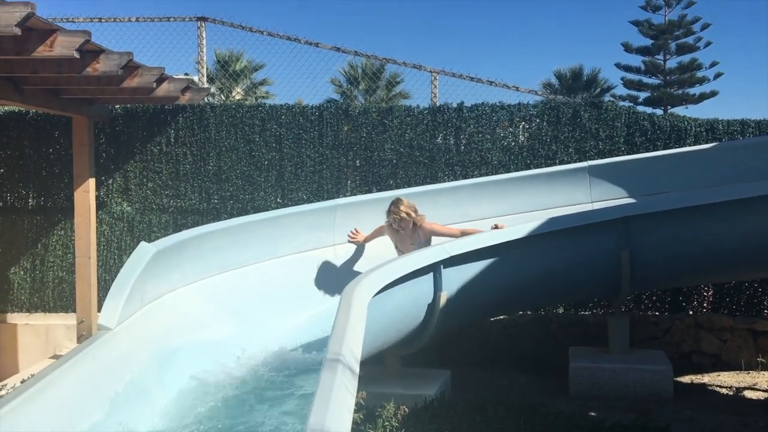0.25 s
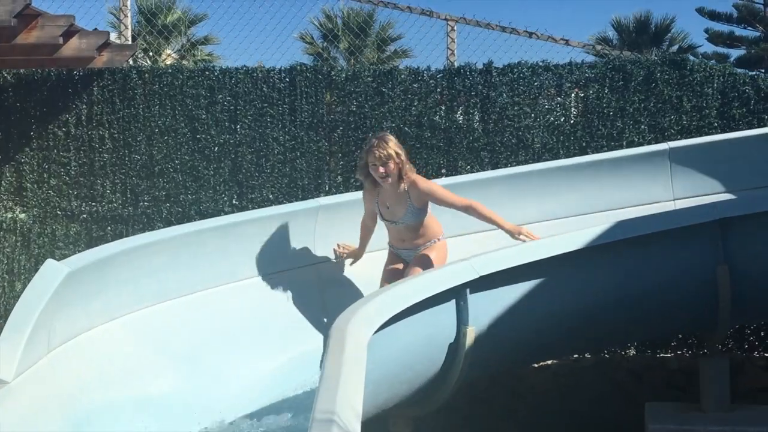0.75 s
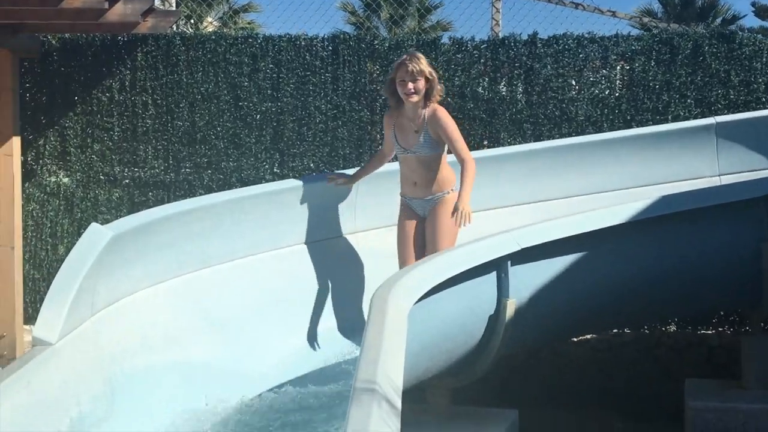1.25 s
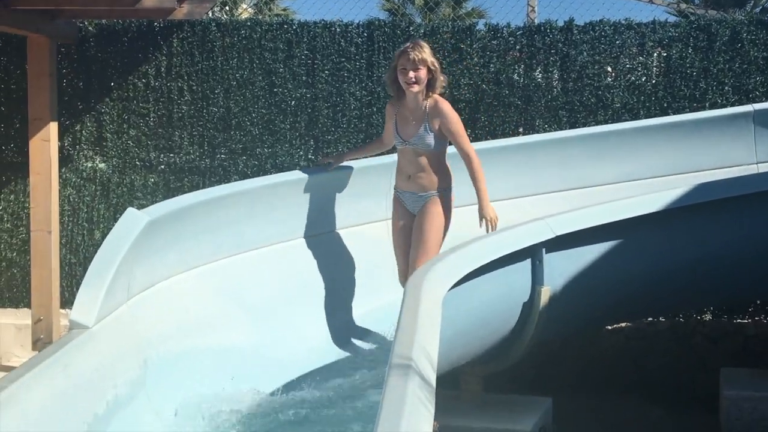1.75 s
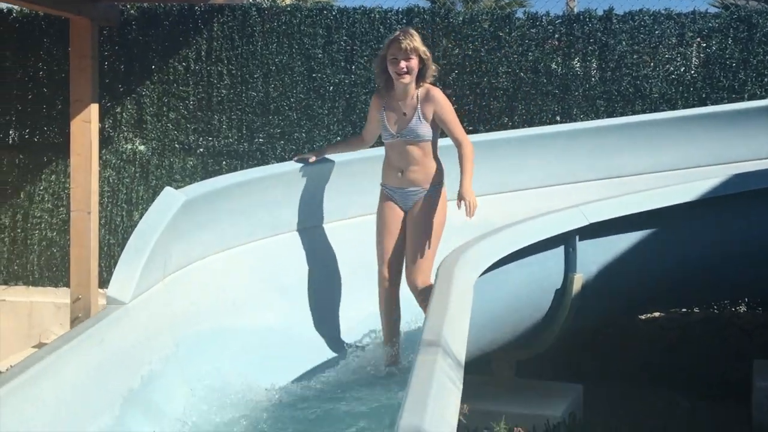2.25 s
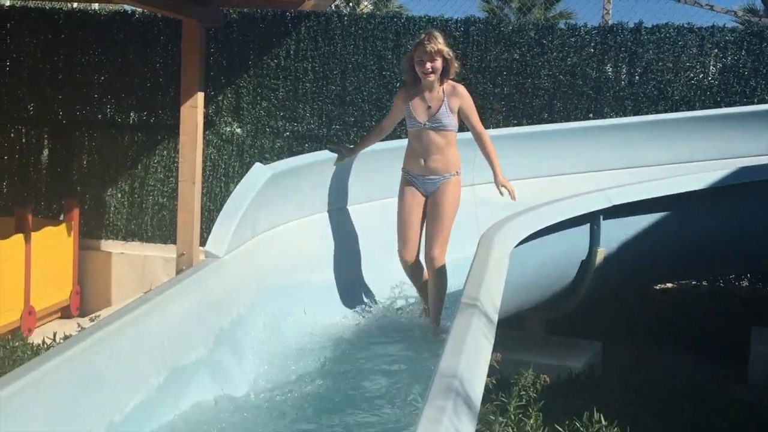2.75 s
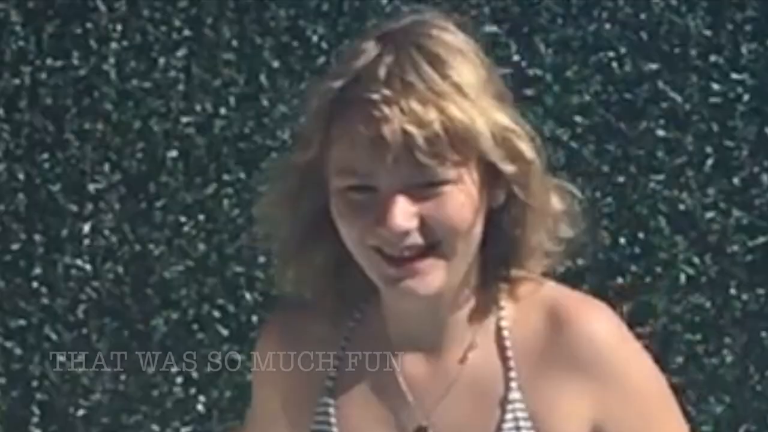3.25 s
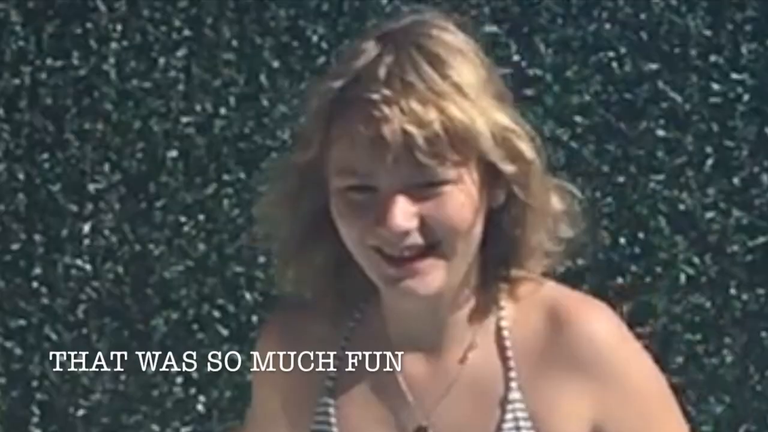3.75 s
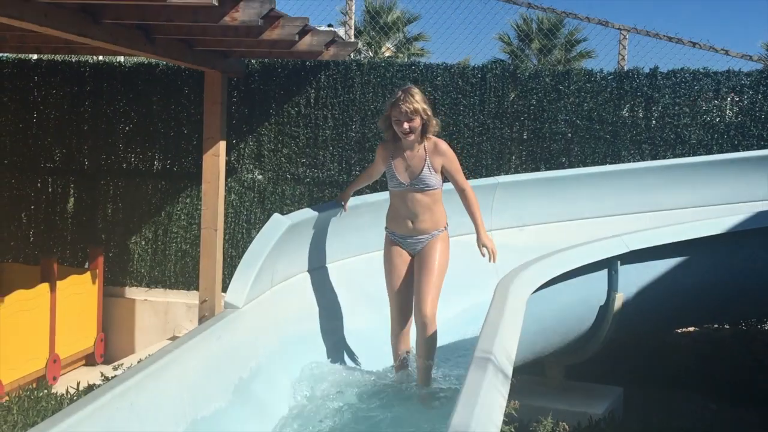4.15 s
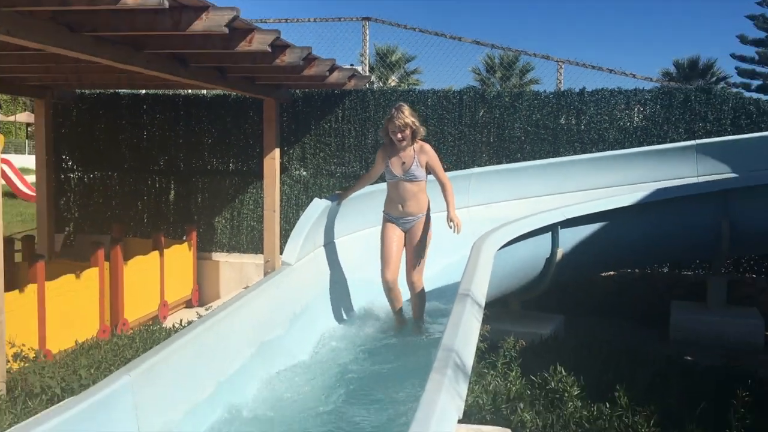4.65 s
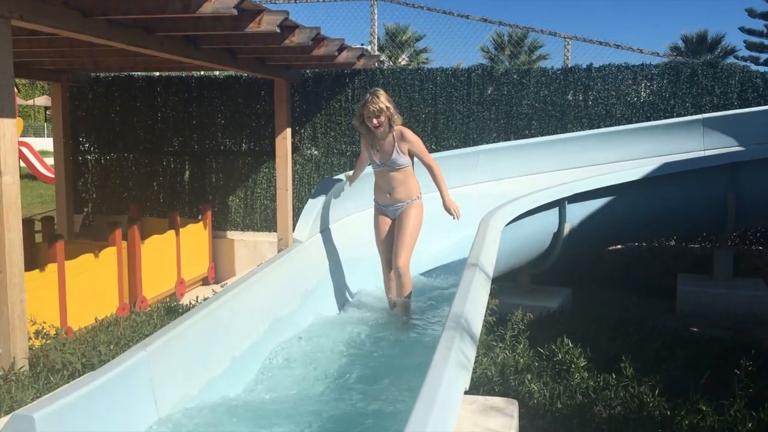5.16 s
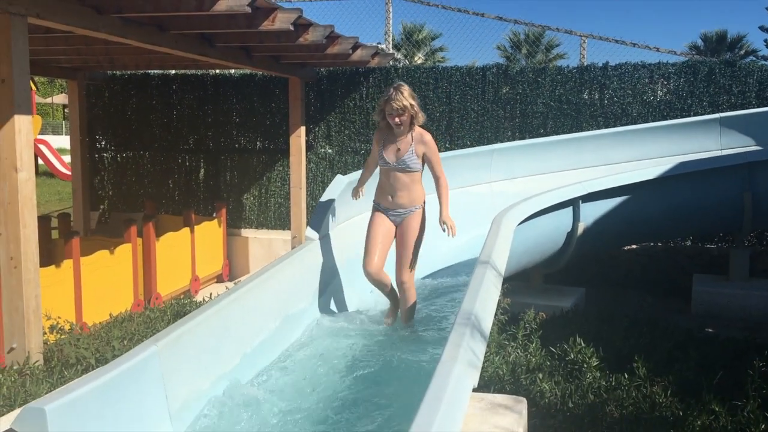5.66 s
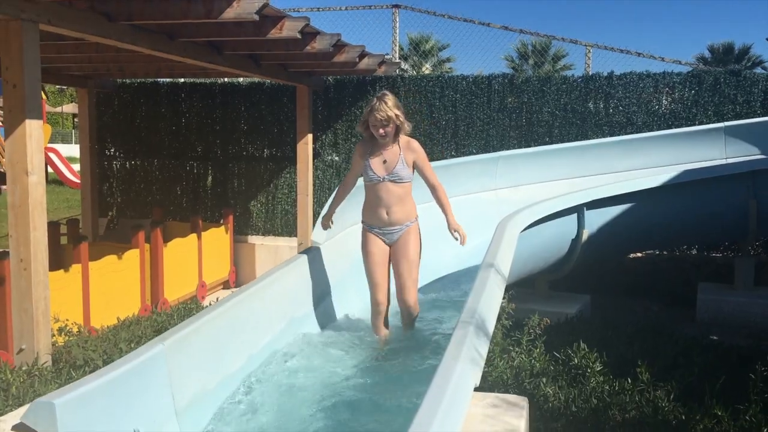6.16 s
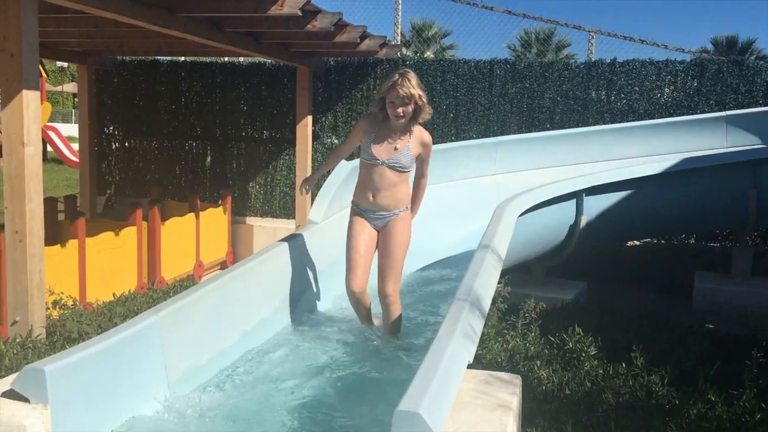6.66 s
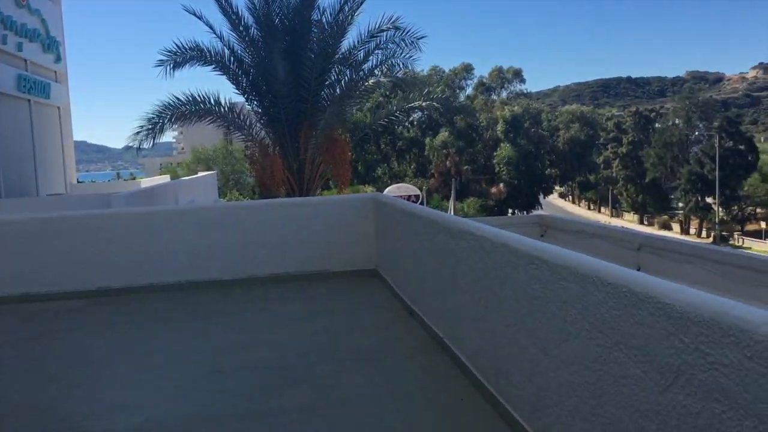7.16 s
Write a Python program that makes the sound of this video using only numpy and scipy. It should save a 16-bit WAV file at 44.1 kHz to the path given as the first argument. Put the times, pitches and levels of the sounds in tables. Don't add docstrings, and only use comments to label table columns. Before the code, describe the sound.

Churning slide water roars softly with bright spray, fizzing bubbles, hollow gulps as legs push through, and ticking drops. Wind buffets the unshielded phone microphone with low thuds and a few pops. The sound cuts out completely mid-way, snaps back with more sloshing and plinks, then switches to an open terrace: a faint low traffic roar and soft, dry sole drags on concrete.

```python
import sys
import numpy as np
from scipy import signal
from scipy.fft import rfft, irfft, next_fast_len
from scipy.io import wavfile
from scipy.ndimage import uniform_filter1d, map_coordinates

SR = 44100
rng = np.random.default_rng(int(sys.argv[2]) if len(sys.argv) > 2 else 0)


def generate_wav(sig):
    pcm = np.round(np.clip(np.atleast_2d(sig).T, -1, 1) * 32767).astype(np.int16)
    wavfile.write(sys.argv[1], SR, pcm)


def volts_from_db(level):
    exponent = np.asarray(level, float) / 20
    return 10 ** exponent


N = 326075


def unit(x):
    return x / np.sqrt(np.mean(x ** 2) + 1e-20)


def along(points, hz):
    f, v = np.transpose(points)
    return np.interp(np.log(hz + 1), np.log(f + 1), v)


def curves(rows):
    s, *columns = np.transpose(rows)
    return [np.interp(np.arange(N) / SR, s, column) for column in columns]


def wobble(rate):
    return map_coordinates(rng.standard_normal(N // 40), [np.arange(N) * rate / SR])


def swells(s, db, rise_s, fall_s):
    t = np.arange(N) / SR
    total = 0
    for peak_s, peak_db in zip(s, db):
        width_s = np.where(t < peak_s, rise_s, fall_s)
        total = total + peak_db * np.exp(-((t - peak_s) / width_s) ** 2)
    return total


def filtered(x, response):
    m = next_fast_len(N + SR // 2)
    return irfft(rfft(x, m) * response(np.fft.rfftfreq(m, 1 / SR)), m)[..., :N]


def rush(spectrum, patchy_db):
    z = signal.stft(rng.standard_normal(N), nperseg=256)[2]
    patches = uniform_filter1d(rng.standard_normal(z.shape), size=5, axis=0)
    patches = uniform_filter1d(patches, size=10, axis=1)
    x = signal.istft(z * volts_from_db(patchy_db * unit(patches)), nperseg=256)[1][:N]
    return unit(filtered(x, lambda hz: volts_from_db(along(spectrum, hz))))


def grains(s, db, hz, ms, rise, size):
    age = np.clip(np.arange(size) / SR / (ms / 1000)[:, None], 0, 1)
    cycles = (hz * ms / 1000)[:, None]
    phase = 2 * np.pi * cycles * (age + rise * (age * age - age) / 2)
    swell = np.sin(np.pi * age ** 0.92) ** 2
    tones = volts_from_db(db)[:, None] * swell * np.sin(phase)
    start = np.round((s - ms / 2000).clip(0) * SR).astype(int)
    at = start[:, None] + np.arange(size)
    return np.bincount(at.ravel(), tones.ravel(), N + size)[:N]


def swarm(count, mid_hz, octaves, cycles, spread_db, tilt_db, rise, size):
    s = rng.random(count) * N / SR
    pitch = rng.standard_normal(count)
    big = rng.exponential(1, count)
    hz = np.clip(mid_hz * 2 ** (octaves * pitch), 220, 15000)
    db = spread_db * big.clip(0, 3) + tilt_db * np.log2(hz / mid_hz)
    ms = np.minimum(1000 * cycles / hz, 1000 * size / SR)
    return unit(grains(s, db, hz, ms, rise, size=size))


def gurgle():
    # frequency in Hz, level in dB per Hz
    gurgle_tone = [(100, -120), (160, -13.5), (240, -1.5), (340, -1.5), (430, -7), (700, -120)]
    # time in seconds, swell in dB
    wades = [(.02, 6), (.3, 4), (.52, 1.5), (2.15, -1.5), (2.85, 1), (4.07, 4.5), (4.24, 5), (4.95, 2),
             (5.15, 2.5), (5.4, 2.5), (5.6, 0.5), (5.75, 4), (6.06, 5), (6.34, 3), (6.44, 2.5), (6.7, 5)]
    level_db = -49 + swells(*np.transpose(wades), rise_s=0.098, fall_s=0.098)
    air = rush(gurgle_tone, patchy_db=0.0) * volts_from_db(1.8 * wobble(8.8))
    return volts_from_db(level_db) * unit(air)


def churn():
    # frequency in Hz, level in dB per Hz
    churn_tone = [(150, -120), (350, -9), (600, -1), (1000, -4.5), (1800, -6.5), (2600, -14), (5000, -24),
                  (12000, -46.5), (16500, -120)]
    bubbles = swarm(count=1600, mid_hz=1092, octaves=0.794, cycles=15,
                    spread_db=5.0, tilt_db=-2.0, rise=0.099, size=900)
    return unit(rush(churn_tone, patchy_db=0.5) + volts_from_db(-7.0) * bubbles)


def spray():
    # frequency in Hz, level in dB per Hz
    spray_tone = [(600, -120), (1500, -1.5), (3200, 1), (4500, -7), (6500, -7.5), (9000, -11.5),
                  (12000, -15), (15800, -21), (17000, -54)]
    hiss = rush(spray_tone, patchy_db=1.5) * volts_from_db(0.61 * wobble(90))
    fizz = swarm(count=8000, mid_hz=5500, octaves=.7, cycles=12,
                 spread_db=4, tilt_db=-4.5, rise=.1, size=200)
    ticks = swarm(count=1500, mid_hz=10270, octaves=0.16, cycles=2.2,
                  spread_db=3.5, tilt_db=-5.5, rise=0.054, size=40)
    return unit(hiss + volts_from_db(-5.0) * fizz + volts_from_db(-15.5) * ticks)


def water():
    # time in seconds, flow strength in dB, extra froth in dB
    flow = [(0, -43, 4), (.36, -43, -1), (.58, -45, 3.5), (.8, -43, 0.5), (1.0, -44.5, 0.5), (1.45, -44, 1),
            (2.15, -45, 1.5), (2.5, -42, 1), (2.75, -44, 4.5), (3.08, -45, 1), (4.3, -44, 2),
            (4.65, -44.5, 1.5), (5.3, -44.5, 2.5), (5.55, -45, 1), (5.95, -45.5, 0.5), (6.2, -48, 3),
            (6.38, -44.5, 2), (6.75, -44.5, 1.5)]
    # time in seconds, swell in dB, share that goes to spray (0-1)
    slaps = [(.1, 2.5, 0.6), (.68, 1.5, .5), (.785, 0, .9), (1.19, 2, .2), (1.778, 1, 0), (2.001, 0.5, 1),
             (2.14, 0, 0), (2.39, -0.5, 0.6), (2.539, -0.5, 0.15), (2.599, 0.5, .4), (2.7, 1, 0.9),
             (4.275, 2, 0.7), (4.525, 0.5, .8), (4.99, 1.5, 0.6), (5.36, 2.5, 0.8), (5.83, 1, .4),
             (6.03, 1, 0), (6.27, -1, 1), (6.31, 1.5, 0.41), (6.56, 0.5, .9)]
    flow_db, froth_db = curves(flow)
    s, slap_db, share = np.transpose(slaps)
    share = share.clip(0, 1)
    rise_s, fall_s = 0.031, 0.023
    churn_db = flow_db + swells(s, 2 * slap_db * (1 - share), rise_s, fall_s)
    usual_db = flow_db.mean()
    spray_db = usual_db - 6 + 1.24 * (flow_db - usual_db) + froth_db
    spray_db = spray_db + swells(s, 2 * slap_db * share, rise_s, fall_s)
    slosh = wobble(25)
    churning = volts_from_db(churn_db + 1.19 + 0.8 * slosh) * churn()
    spraying = volts_from_db(spray_db + 0.52 * slosh) * spray()
    return gurgle() + churning + spraying


def splashes():
    # time in seconds, peak in
    # dB, pitch in Hz, length in ms
    big_bubbles = [(0.6829, -31, 410, 7.8), (1.1864, -40, 540, 17.4), (1.4025, -40, 393, 17.4),
                   (1.5353, -37, 1077, 17.4), (1.6261, -43, 2390, 17.4), (1.942, -29, 263.5, 26.1),
                   (1.9585, -38.5, 965, 8.7), (2.223, -41, 1170, 15), (2.311, -39, 1910, 18),
                   (2.5325, -35, 1100, 8.7), (2.7266, -40, 710, 22), (4.3043, -39, 1406, 19),
                   (4.5833, -41, 2150, 8.7), (4.7335, -44, 2240, 7.7), (5.0828, -38, 1930, 4.4),
                   (5.4399, -39, 1410, 8), (5.5093, -34, 254, 20), (5.62, -41, 1625, 17.4),
                   (5.8304, -30, 1250, 2.03), (6.0307, -30.5, 344, 25.2), (6.07, -33.5, 210, 24.3),
                   (6.1441, -36, 833, 16.5), (6.2934, -42, 1490, 4.4), (6.3182, -35, 980, 7.7),
                   (6.326, -31.5, 298, 27.4), (6.427, -34, 467, 8.2), (6.5283, -37, 2020, 4.4),
                   (6.6644, -37, 1700, 4.4), (6.693, -41, 1190, 22)]
    # time in seconds, peak in dB, pitch in Hz
    plastic_drops = [(.0915, -45, 9200), (.7612, -36, 13640), (.8506, -42, 13100), (1.356, -41, 13400),
                     (1.7594, -34, 6550), (2.0049, -35.5, 8500), (2.1437, -38, 8640),
                     (2.2936, -42.5, 12580), (2.394, -30, 8670), (2.7077, -32, 7400), (4.1549, -47, 12100),
                     (4.2985, -31, 6540), (4.5402, -28, 4570), (4.5893, -35, 6750), (4.7449, -39, 7580),
                     (5.821, -37, 7350), (5.8266, -40, 14100), (5.9358, -39.5, 13860), (6.021, -38, 7810),
                     (6.2732, -38, 11600), (6.3716, -37.5, 13630), (6.5351, -38, 7960), (6.6521, -34, 7400),
                     (6.6632, -29, 11540), (6.6726, -35, 12800), (6.7229, -42, 11900)]
    # time in seconds, peak in dB, pitch in Hz
    water_drops = [(.082, -42, 7010), (0.098, -34, 4430), (.112, -36, 4820), (.7886, -40, 4960),
                   (1.6106, -44, 7920), (1.8578, -43.5, 10300), (2.0047, -40.5, 3220), (2.0797, -40, 3850),
                   (2.138, -35, 3710), (2.498, -41, 5710), (4.485, -35, 8020), (4.583, -41, 6490),
                   (4.6162, -46, 7350), (4.824, -40, 5860), (5.3056, -45, 5070), (5.3719, -53, 12600),
                   (5.6791, -46, 5510), (5.825, -36.5, 7260), (6.272, -36.5, 4400), (6.2984, -36, 2490),
                   (6.4265, -41, 4880), (6.5618, -34.5, 4570)]
    gulps = grains(*np.transpose(big_bubbles), rise=0.058, size=1700)

    s, db, hz = np.transpose(plastic_drops + water_drops)
    ms = np.repeat([0.41, 2.8], [len(plastic_drops), len(water_drops)])
    notes = grains(s, db - 1.8, hz, ms, rise=.05, size=300)

    chance = rng.standard_normal((len(s), 4, 3))
    spit_s = (s[:, None] + .0015 * chance[..., 0]).ravel()
    spit_db = ((db + 3.0 * np.log2(ms))[:, None] - 3.5 + 1.1 * chance[..., 1]).ravel()
    spit_hz = 0.74 * hz[:, None] * 2 ** (0.67 * chance[..., 2])
    spit_hz = np.clip(spit_hz, 2500, 14000).ravel()
    drops = notes + grains(spit_s, spit_db, spit_hz, 1800 / spit_hz, rise=.05, size=48)

    trough = rng.standard_normal(400) * volts_from_db(-60 * np.arange(400) / SR / .012)
    echo = signal.fftconvolve(drops, trough / np.linalg.norm(trough))[:N]
    return gulps + drops + volts_from_db(-4.5) * echo


def wind():
    # time in seconds, breeze strength in dB
    breeze = [(0, -47), (.43, -54.5), (.8, -43), (1.03, -52), (1.2, -57.5), (1.4, -52.5), (1.58, -46.5),
              (1.8, -53.5), (2.4, -55.5), (3.0, -53), (4.2, -54.5), (4.62, -53), (4.9, -59), (5.08, -48.5),
              (5.6, -53.5), (6.18, -55), (6.38, -47.5), (6.62, -54.5)]
    # frequency in Hz, level in dB per Hz
    buffet_tone = [(16, -37.5), (28, -15.5), (50, 0), (70, 0), (108, -4), (140, -5.5), (300, -17),
                   (390, -49), (660, -120)]
    # time in seconds, peak in dB, pitch in Hz
    thuds = [(.659, -34, 78), (.682, -23.5, 93), (.711, -30, 94), (0.763, -31, 89), (0.787, -27.5, 80),
             (.855, -31, 132), (0.904, -33, 193), (0.921, -26, 68.6), (.966, -32.5, 70), (1.416, -25, 124),
             (1.426, -32.5, 52), (1.507, -31.5, 67.6), (1.649, -29, 135), (2.973, -37, 62.7),
             (4.267, -35, 119), (4.312, -37, 89), (4.379, -31, 105), (4.563, -37.5, 73), (5.046, -37, 84.4),
             (5.159, -34, 88), (5.463, -33, 90), (5.53, -33.5, 64.6), (5.573, -37, 65),
             (5.826, -33.5, 81.5), (6.086, -33, 86), (6.131, -26.5, 118), (6.259, -36, 83.4),
             (6.304, -29, 75), (6.492, -35, 57.5), (6.694, -32, 88.5)]
    # time in seconds, peak in dB, settling pitch in Hz
    pops = [
        (0.9023, -28.5, 154),
        (1.3991, -22.5, 144),
        (1.6425, -22.5, 130),
        (2.9415, -29.5, 138),
        (6.1164, -25, 144),
        (6.316, -29.5, 302),
    ]
    rumble = unit(volts_from_db(2.0 * wobble(22)) * rush(buffet_tone, patchy_db=1.5))
    x = volts_from_db(curves(breeze)[0] + 6.5) * rumble
    s, db, hz = np.transpose(thuds)
    x += grains(s, db, hz, 1000 * 3.05 / hz, rise=-0.34, size=3200)
    t = np.arange(SR // 5) / SR
    for pop_s, pop_db, pop_hz in pops:
        turns = pop_hz * (t + 1.74 * 0.0029 * (1 - np.exp(-t / 0.0054)))
        fade = volts_from_db(pop_db - 60 * t / 0.028)
        x[round(pop_s * SR):][:len(t)] += fade * np.sin(2 * np.pi * turns)
    return x


def sandals():
    # middle in seconds, half length in seconds, level in dB
    drags = [
        (6.79, 0.013, -70),
        (6.844, 0.03, -65.5),
        (6.92, 0.047, -65.5),
        (7.052, 0.052, -63.5),
        (7.113, 0.036, -73),
        (7.302, 0.036, -60),
        (7.264, 0.035, -73),
        (7.36, .04, -73),
    ]
    # frequency in Hz, level in dB per Hz
    scuff_tone = [(1500, -120), (3000, 2), (6000, -1.5), (10000, -6.5), (15800, -13), (17000, -57.5)]
    # time in seconds, peak in dB, pitch in Hz, length in ms
    cracks = [
        (6.812, -48, 5000, 0.69),
        (6.928, -56, 6000, .8),
        (7.0987, -53, 7350, 0.66),
    ]
    t = np.arange(N) / SR
    drag = sum(volts_from_db(db) * np.exp(-np.abs((t - s) / half) ** 3) for s, half, db in drags)
    grit = unit(volts_from_db(1.2 * wobble(200)) * rush(scuff_tone, patchy_db=1.5))
    sheen = unit(np.gradient(np.gradient(grit)))
    scuffs = drag * (grit + 0.21 * drag / drag.max() * sheen)
    return scuffs + grains(*np.transpose(cracks), rise=0.045, size=80)


def road():
    # time in seconds, road level in dB
    traffic = [
        (6.765, -54),
        (6.777, -53),
        (7.365, -52.5),
        (7.39, -53),
    ]
    # frequency in Hz, level in dB per Hz
    road_tone = [(15, -36), (25, 0), (100, 3.5), (140, 0.5), (300, -7), (600, -11), (800, -12),
                 (1050, -3.5), (1400, -10), (1950, -5.5), (3000, -16), (5300, -29.5), (8200, -37),
                 (15700, -50)]
    return volts_from_db(curves(traffic)[0] + 1.6) * rush(road_tone, patchy_db=1.1)


def past_phone_body(x):
    # middle in Hz, width in Hz, depth in dB
    body_dips = [(438, 100, -1.5), (780, 180, -3), (2860, 400, -5.5), (4910, 350, -4), (7720, 760, -3.5),
                 (10450, 600, -5.5)]

    def response(hz):
        return volts_from_db(sum(db / (1 + (2 * (hz - mid) / width) ** 2) for mid, width, db in body_dips))

    return filtered(x, response)


def scene():
    # time in seconds, gain of the slide (0-1)
    slide_cut = [
        (0, 1),
        (3.207, 1),
        (3.2226, 0),
        (4.0228, 0),
        (4.0232, 1),
        (6.7594, 1),
        (6.7599, 0),
    ]
    # time in seconds, gain of the terrace (0-1)
    terrace_cut = [
        (6.7596, 0),
        (6.76, .5),
        (6.768, 1),
    ]

    def below_top(hz):
        return hz < 15740

    slide = filtered(past_phone_body(water()) + splashes() + wind(), below_top)
    terrace = filtered(road() + sandals(), below_top)
    return (slide * curves(slide_cut)[0] + terrace * curves(terrace_cut)[0])[None]


def band_limit(x):
    return signal.sosfilt(signal.butter(12, 15890, fs=SR, output="sos"), x)


def record(dry):
    return band_limit(dry)


dry = scene()
out = record(dry)
generate_wav(out)
```